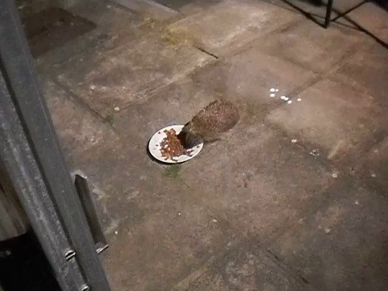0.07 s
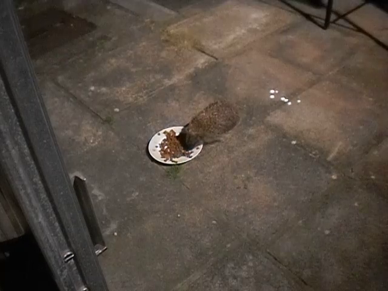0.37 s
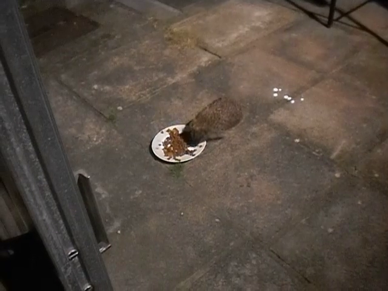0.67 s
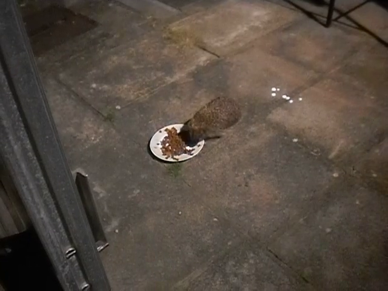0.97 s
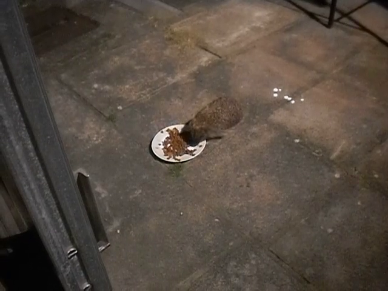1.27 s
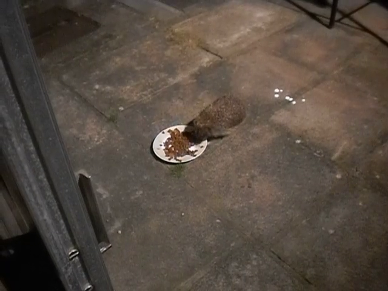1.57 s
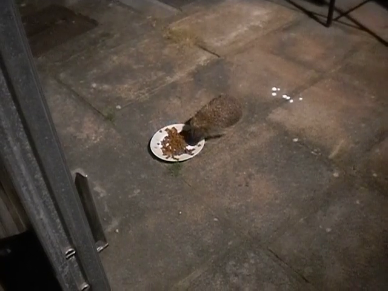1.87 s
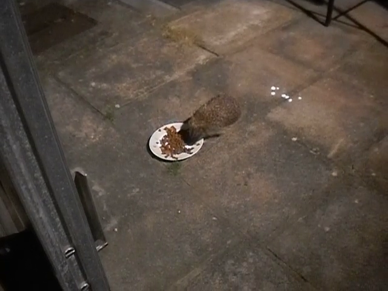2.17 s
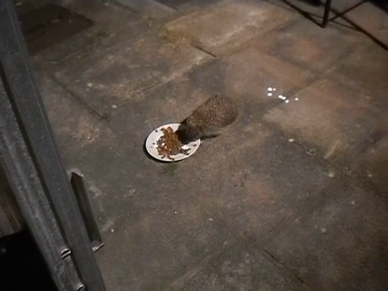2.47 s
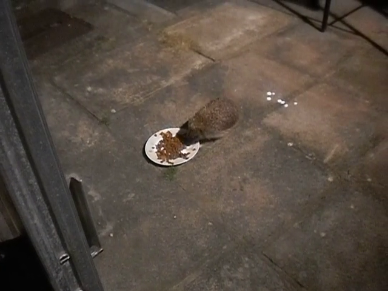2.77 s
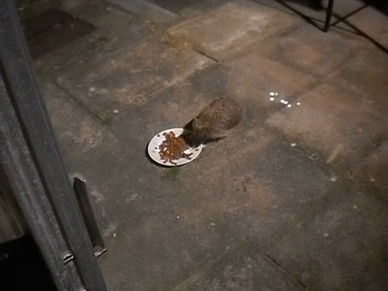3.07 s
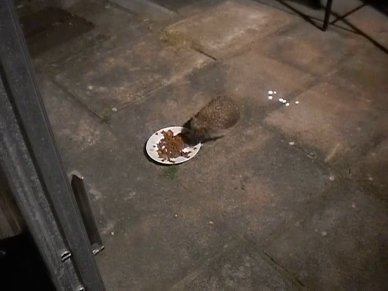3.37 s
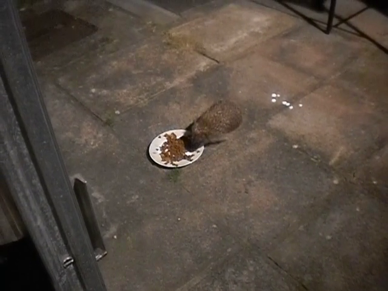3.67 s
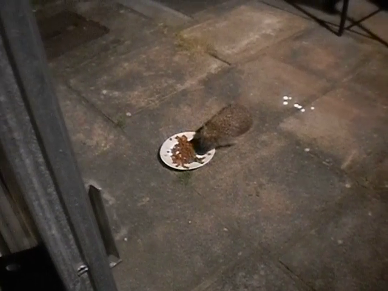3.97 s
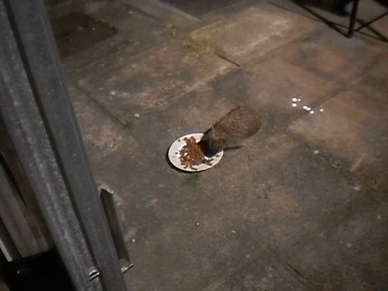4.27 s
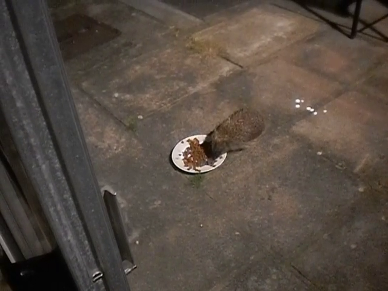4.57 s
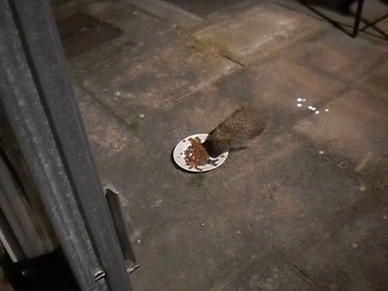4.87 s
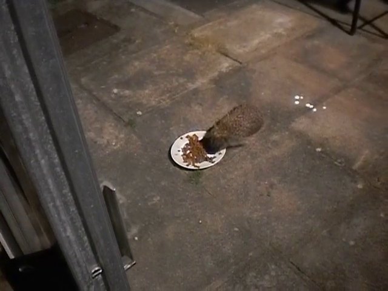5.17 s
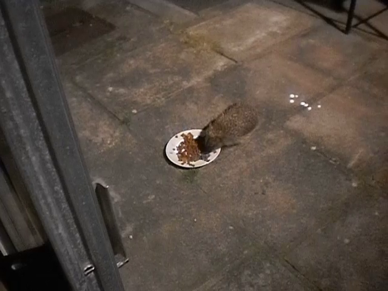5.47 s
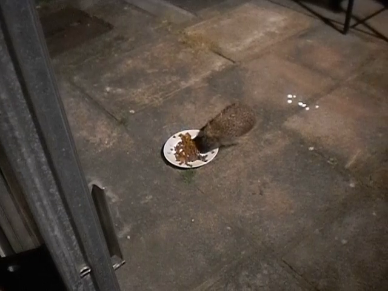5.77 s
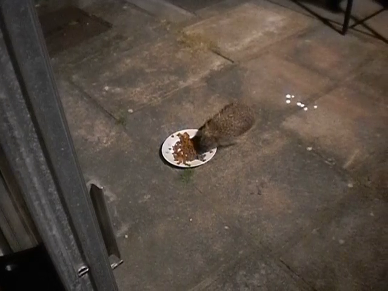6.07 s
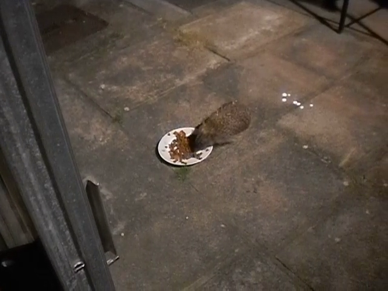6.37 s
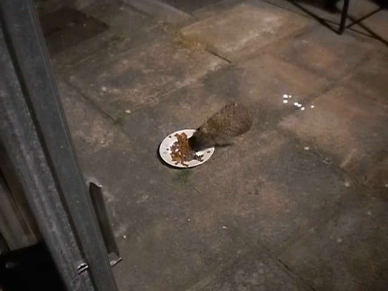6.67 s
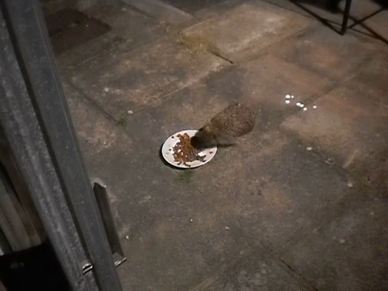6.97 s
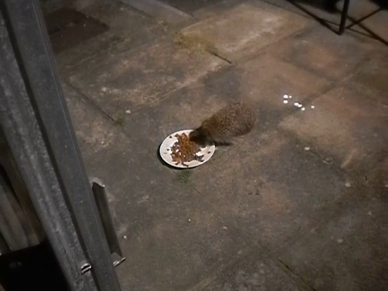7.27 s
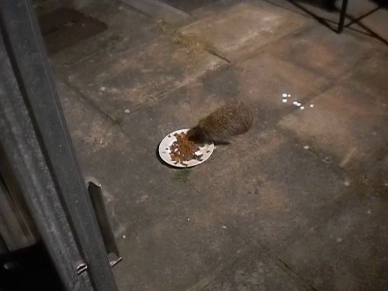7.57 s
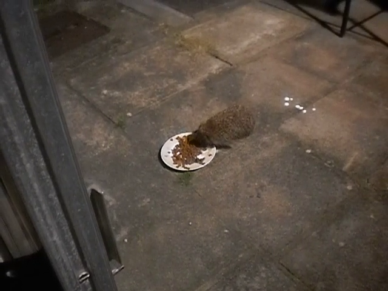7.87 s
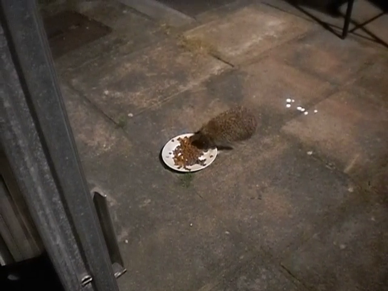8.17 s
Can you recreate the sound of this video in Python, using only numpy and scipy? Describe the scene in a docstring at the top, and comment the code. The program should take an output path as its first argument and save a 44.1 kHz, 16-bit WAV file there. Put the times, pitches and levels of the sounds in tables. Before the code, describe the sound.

Quiet night-time garden ambience, heard through a muffled, hissy camera microphone. It opens with one loud overloaded pop and a short plastic click. After that the steady hiss dominates, with faint sputtering ticks from the electronics, alone and in little clusters. Distant traffic adds a weak low rumble and a slight wash of tyres, and a few soft, low handling bumps come late on.

```python
"""A thump opens the scene: a small, narrow-band camera microphone overloads as it is switched on
in a garden at night. Its preamplifier hisses, and a plastic button clicks, exciting the modes of the case.
Popcorn noise then sputters in tiny one-sided pulses. Over a faint rumble a far engine gathers speed,
tyre noise swells and fades on a distant road, and late on a hand softly bumps the camera."""
import sys
import numpy as np
from scipy.fft import rfft, irfft, next_fast_len
from scipy.io import wavfile
from scipy.ndimage import map_coordinates

SR = 44100
rng = np.random.default_rng(int(sys.argv[2]) if len(sys.argv) > 2 else 0)


def dump(signal):
    """Clip the signal to [-1, 1] and save it as 16-bit WAV at the path in sys.argv[1]."""
    limited = np.clip(np.atleast_2d(signal).T, -1, 1)
    pcm = np.round(limited * 32767).astype(np.int16)
    wavfile.write(sys.argv[1], SR, pcm)


N = 366912
TIME = np.arange(N) / SR
RAIL = .707  # clipping amplitude set by the supply


def amp(db):
    """Amplitude ratio of a level in decibels."""
    return 10 ** (np.asarray(db) / 20)


def wobble(rate):
    """Smooth random modulation: a spline through `rate` Gaussian values a second."""
    return map_coordinates(rng.standard_normal(int(N * rate / SR) + 4), [TIME * rate])


def filtered(x, response):
    """Linear filtering: the spectrum of x is multiplied by a frequency response."""
    size = next_fast_len(N + SR)
    return irfft(rfft(x, size) * response(np.fft.rfftfreq(size, 1 / SR)), size)[:N]


def coloured(x, points):
    """Spectral shaping by (f/Hz, gain/dB) points joined on a logarithmic frequency axis."""
    f, db = np.transpose(points)
    return filtered(x, lambda hz: amp(np.interp(np.log(hz + 1), np.log(f), db)))


def noise(points):
    """Gaussian noise of the given spectral shape, normalised to unit rms."""
    x = coloured(rng.standard_normal(N), points)
    return x / np.sqrt(np.mean(x ** 2) + 1e-20)


def swells(rows):
    """A sum of Gaussian envelopes, one for each (t/s, half width/s, level/dB)."""
    return sum(amp(db) * np.exp(-((TIME - peak) / width) ** 2) for peak, width, db in rows)


def switch_on(start=.03943, edge_hz=4200):
    """Capacitor discharge: the bias voltage jumps, swings back past zero and drains exponentially."""
    age = np.maximum(TIME - start, 0)
    jump = amp(23) * np.exp(-age / .0024) + amp(-4.5) * np.exp(-age / .015)
    drain = amp(-18) * np.exp(-age / .55)
    voltage = (age > 0) * (drain - jump)
    # steep filters on both sides of the overloaded converter ring around the jump
    low_pass = lambda hz: 1 / (1 + (hz / edge_hz) ** 44)
    clipped = np.clip(filtered(voltage, low_pass), -RAIL, RAIL)
    return filtered(clipped, low_pass)


# spectrum of the circuit noise: f/Hz, relative density level/dB
HISS_SPECTRUM = [(35, -30), (60, -3), (108, -7.5), (200, -6.5), (340, -9), (830, -12.5), (1380, -15.5),
                 (3570, -20.5), (3780, -23.5), (4290, -40), (4700, -71), (6110, -102), (10300, -120)]
# steady tones of the electronics: f/Hz, rms level/dB
CIRCUIT_TONES = [(198, -61.5), (1847, -77), (3694.8, -72), (4305, -90.5)]

def hiss(level_db=-43.5, cutoff_hz=4620):
    """Stationary circuit noise: a band-limited continuous spectrum with a few weak spectral lines."""
    tones = sum(np.sqrt(2) * amp(db) * np.sin(2 * np.pi * hz * TIME + wobble(4))
                for hz, db in CIRCUIT_TONES)
    broadband = amp(level_db) * noise(HISS_SPECTRUM)
    return filtered(broadband, lambda hz: hz < cutoff_hz) + tones


# spectrum of the far vehicle's rumble: f/Hz, relative density level/dB
RUMBLE_SPECTRUM = [(5, -9), (15, -2.5), (30, 5.5), (55, -3), (90, -15), (160, -22), (400, -67.5),
                   (1500, -140)]
# swells added to the steady rumble: peak t/s, half width/s, level/dB
RUMBLE_SWELLS = [(5.65, .3, -47), (6.6, .9, -51.5)]

def rumble(steady_db=-53, uneven_db=2.5):
    """Amplitude-modulated low-frequency noise: a far vehicle rumbles and swells unevenly."""
    envelope = (amp(steady_db) + swells(RUMBLE_SWELLS)) * amp(uneven_db * wobble(8))
    return envelope * noise(RUMBLE_SPECTRUM)


# impacts of the button: t/s, relative level/dB
BUTTON_CONTACTS = [(.1688, -19), (.1704, -23), (.1752, -7.3), (.1772, -22), (.1843, -27), (.2058, -37)]
# normal modes of the plastic case: f/Hz, relative level/dB, T60/s
CASE_MODES = [(470, -18, .04), (595, -15, .035), (692, -9.5, .085), (920, -14, .035), (1230, -16, .03),
              (1500, -5, .012), (1730, -7, .018), (2850, -5, .018), (3070, -3, .014), (3300, -8, .011),
              (3770, -20, .06), (4226, -19, .06)]
# the camera's passband, for the button and the pops: f/Hz, gain/dB
PASSBAND = [(3700, 0), (4000, -0.5), (4300, -16.5), (4500, -33), (4700, -73.5), (5000, -120)]

def button(crack_db=-17, crack_t60=.016, corner_hz=450):
    """Impact excitation: each contact cracks and sets the damped modes of the case ringing."""
    out, t = np.zeros(N), np.arange(SR // 4) / SR
    attack = 1 - np.exp(-t / .0004)
    for start, db in BUTTON_CONTACTS:
        ring = sum(amp(level + rng.normal(0, 1) - 60 * t / t60) * np.sin(2 * np.pi * hz * t)
                   for hz, level, t60 in CASE_MODES)
        crack = amp(crack_db - 60 * t / crack_t60) * rng.standard_normal(len(t))
        out[round(start * SR):][:len(t)] += amp(db) * attack * (ring + crack)
    # a source much smaller than the wavelength radiates little bass
    radiated = filtered(out, lambda hz: (1j * hz / (corner_hz + 1j * hz)) ** 2)
    return coloured(radiated, PASSBAND)


# bursts of pops in the preamplifier: onset t/s, length/s (0 for a lone pop), relative level/dB
POP_BURSTS = [(.7141, .0386, -29), (.9228, .0527, -27), (1.4847, 0, -27.5), (1.852, .0151, -28),
              (2.0068, .0486, -28.5), (2.7139, .0586, -28), (3.324, .0055, -30.5), (3.5983, 0, -26.5),
              (3.6902, .0186, -30), (4.2517, 0, -28), (4.4417, .0238, -29), (4.5905, .0026, -28.5),
              (4.7204, .0408, -27), (4.8811, .0274, -26), (5.1918, 0, -29.5), (5.5787, .0679, -28.5),
              (5.8696, .0545, -29.5), (6.3278, .0655, -28.5), (6.5759, .0698, -27), (6.7821, .0461, -29.5),
              (7.1922, 0, -26), (7.9345, .0383, -29.5)]

def burst_pops(pop_s, pops_per_s=36, jitter=.2, log_spread=.2):
    """Jittered pulse trains, each of one height, as rows of (t/s, relative level/dB, duration/s)."""
    pops = []
    for start, length, db in POP_BURSTS:
        gaps = int(np.ceil(length * pops_per_s))
        for k in range(gaps + 1):
            slip = rng.normal(0, jitter) if 0 < k < gaps else 0
            when = start + length * (k + slip) / max(gaps, 1)
            pops.append((when, db, pop_s * np.exp(rng.normal(0, log_spread))))
    return pops


def sputter(pop_s=.0006, gain_db=1, droop_hz=60, rounding_hz=2000):
    """Popcorn noise: rectangular pulses of one sign, in bursts and alone, among many fainter ones."""
    faint = [(when * N / SR, -35 + 6 * (height - .5), .0003 * (.5 + 2 * width ** 2))
             for when, height, width in rng.random((420, 3))]
    strays = [(when * N / SR, -32 + 5 * (height - .5), pop_s) for when, height in rng.random((22, 2))]
    current = np.zeros(N)
    for when, db, duration in burst_pops(pop_s) + strays + faint:
        first = max(round((when - duration / 2) * SR), 0)
        current[first:][:max(round(duration * SR), 1)] += amp(db + gain_db)
    # the coupling droops after each pulse, and the amplifier rounds its edges
    pulses = filtered(current, lambda hz: 1j * hz / (droop_hz + 1j * hz) / (1 + (hz / rounding_hz) ** 2))
    return coloured(pulses, PASSBAND)


# pulls of the far engine: onset t/s, hold/s, initial firing f/Hz, rms level/dB
ENGINE_PULLS = [(.78, .02, 34, -49), (3.76, .03, 29, -42.5), (4.55, .4, 44, -54), (6.33, .66, 44.5, -45.5)]

def engine(rev_hz_per_s=13.5, attack_s=.24, fade_db_per_s=16, unsteady_rad=.5):
    """Periodic firing: a far engine drones at its firing frequency, which climbs through each gear."""
    out = np.zeros(N)
    for start, hold, first_hz, db in ENGINE_PULLS:
        age = np.maximum(TIME - start, 0)
        fade_db = fade_db_per_s * np.maximum(age - attack_s - hold, 0)
        envelope = np.minimum(age / attack_s, 1) * amp(db - fade_db)
        firing_hz = first_hz + rev_hz_per_s * age
        phase = 2 * np.pi * np.cumsum(firing_hz) / SR + unsteady_rad * wobble(16)
        out += envelope * np.sqrt(2) * np.sin(phase)
    return out


# spectrum of distant tyre noise: f/Hz, relative density level/dB
TYRE_SPECTRUM = [(300, -28.5), (600, -9.5), (850, -3), (1130, 0.5), (1350, -15), (2500, -46.5),
                 (4500, -120)]
# far cars going by: closest approach t/s, half width/s, level/dB
CAR_PASSES = [(1.3, 1.1, -58.5), (8.05, .3, -54.5)]

def tyres(uneven_db=2.5):
    """Rolling noise: a soft band that rises as each distant car nears and falls as it recedes."""
    return swells(CAR_PASSES) * amp(uneven_db * wobble(12)) * noise(TYRE_SPECTRUM)


# soft bumps of the hand holding the camera: t/s, relative level/dB
HAND_BUMPS = [(5.36, -33), (5.509, -36.5), (5.639, -33.5), (5.699, -36), (5.859, -33.5), (6.328, -40),
              (6.428, -35), (7.511, -37)]

def handling(gain_db=-1, body_hz=72, rise_s=.0076):
    """Heavily damped oscillation: each bump of the hand rocks the camera for a cycle or two."""
    out, t = np.zeros(N), np.arange(SR // 8) / SR
    envelope = t / rise_s * np.exp(1 - t / rise_s)
    for start, db in HAND_BUMPS:
        hz = body_hz * np.exp(rng.normal(0, .16))
        out[round(start * SR):][:len(t)] += amp(db + gain_db) * envelope * np.sin(2 * np.pi * hz * t)
    return out


def scene():
    """Superposition: the other sources join the thump once the amplifier recovers from overload."""
    recovery = np.clip((TIME - .046) / .015, 0, 1)
    sources = hiss() + rumble() + button() + sputter() + engine() + tyres() + handling()
    return (switch_on() + recovery * sources)[None]


def record(dry, top_hz=16000):
    """Saturation and band limiting: the output stage clips at the rail and passes nothing above top_hz."""
    return filtered(np.clip(dry[0], -RAIL, RAIL), lambda hz: hz < top_hz)[None]


dry = scene()
out = record(dry)
dump(out)
```